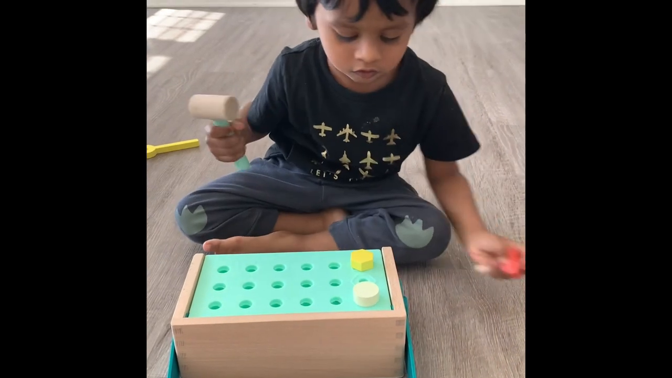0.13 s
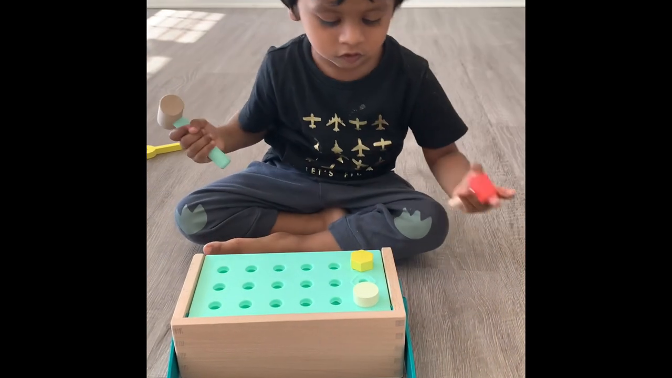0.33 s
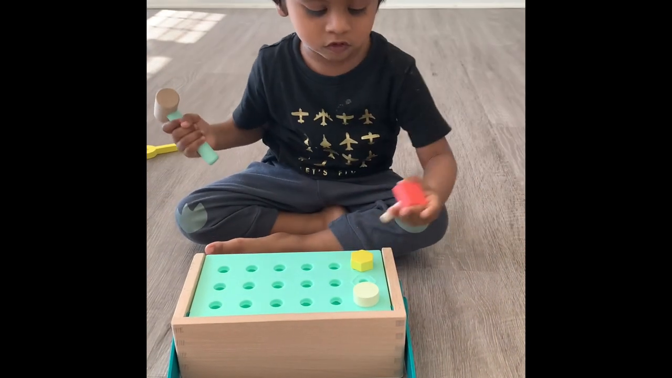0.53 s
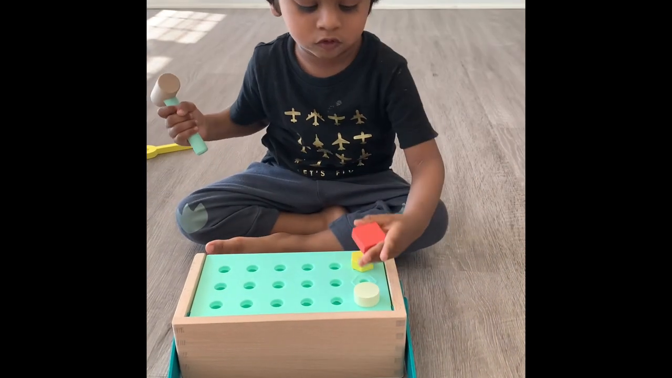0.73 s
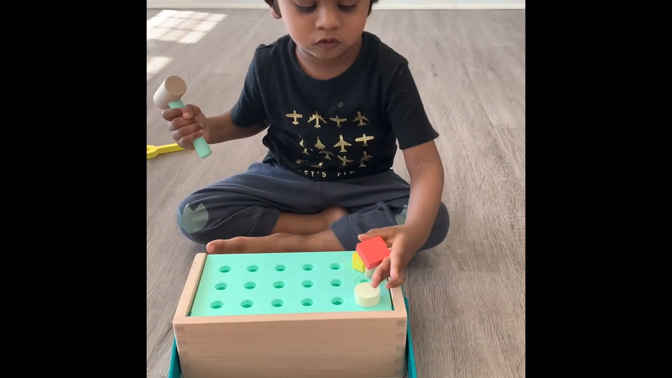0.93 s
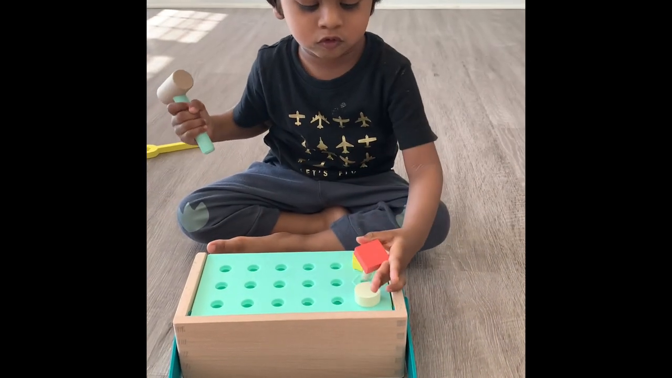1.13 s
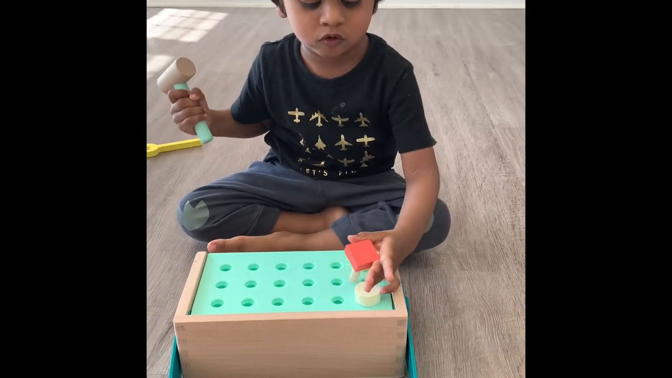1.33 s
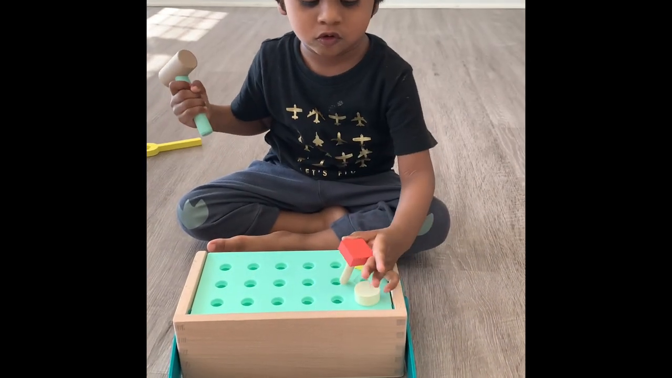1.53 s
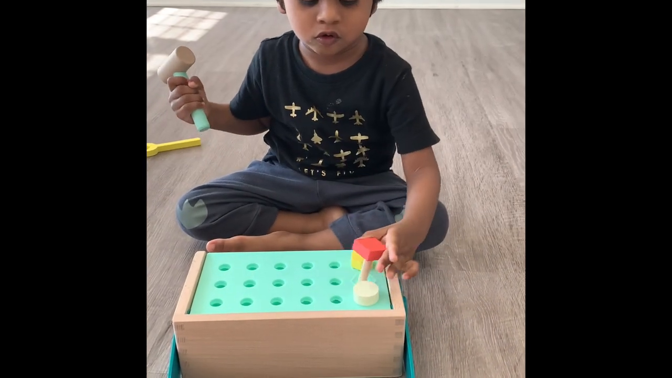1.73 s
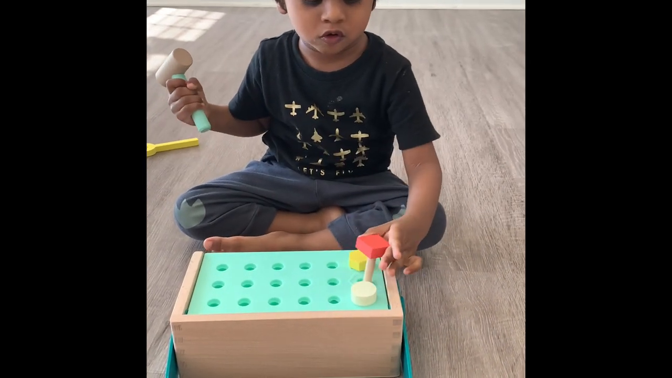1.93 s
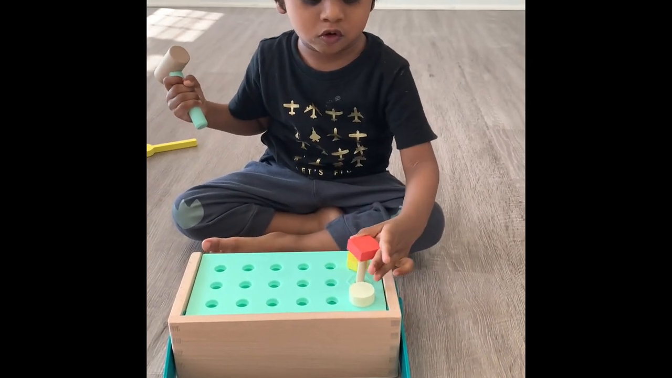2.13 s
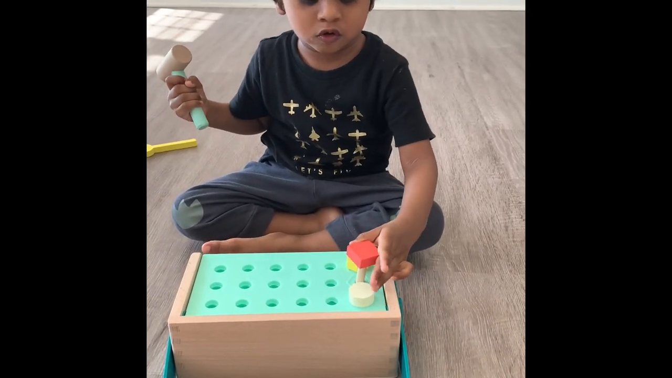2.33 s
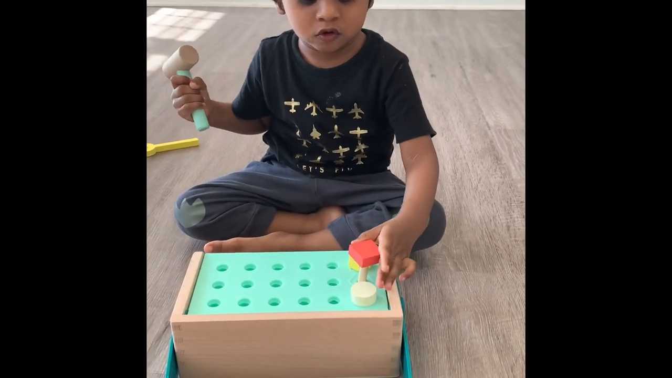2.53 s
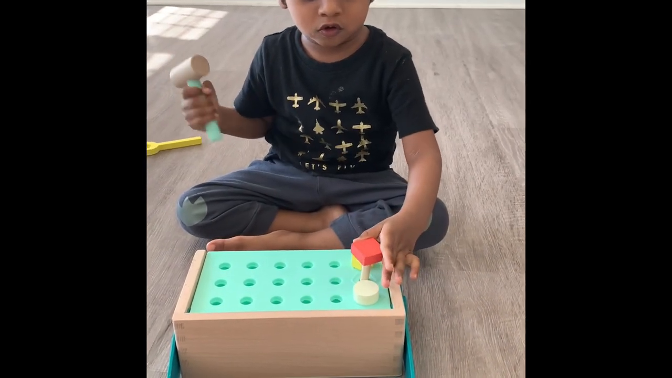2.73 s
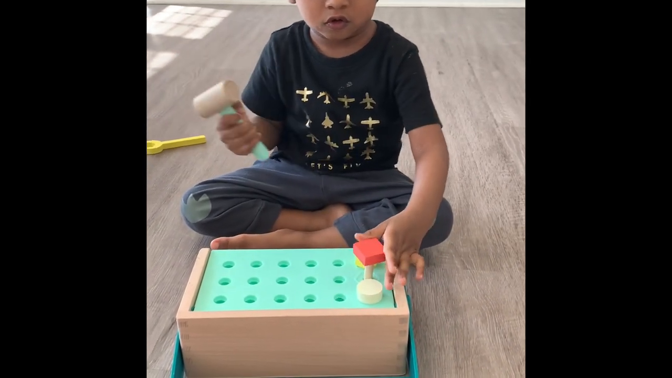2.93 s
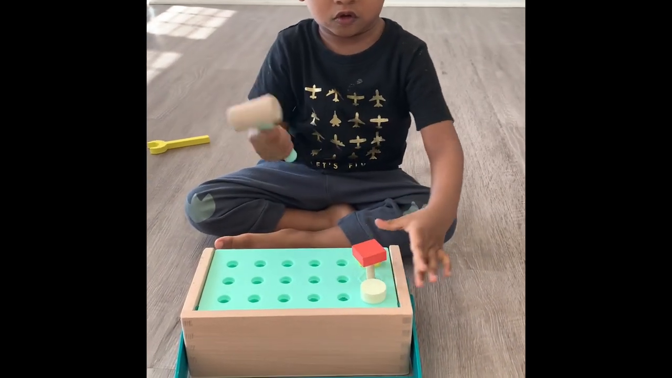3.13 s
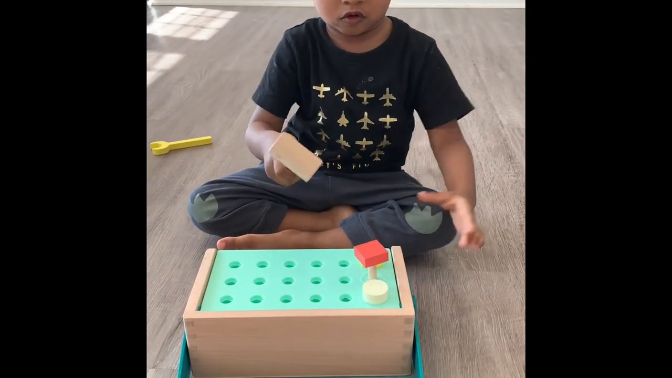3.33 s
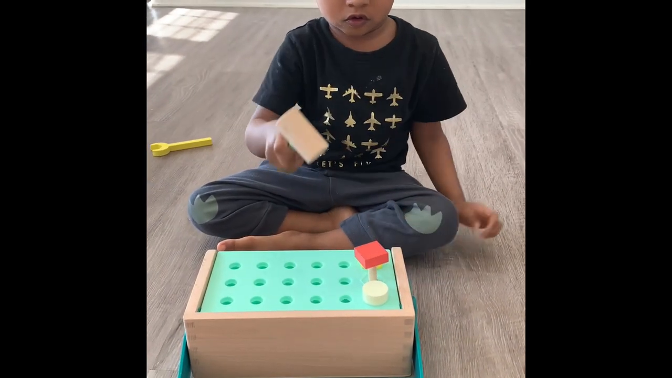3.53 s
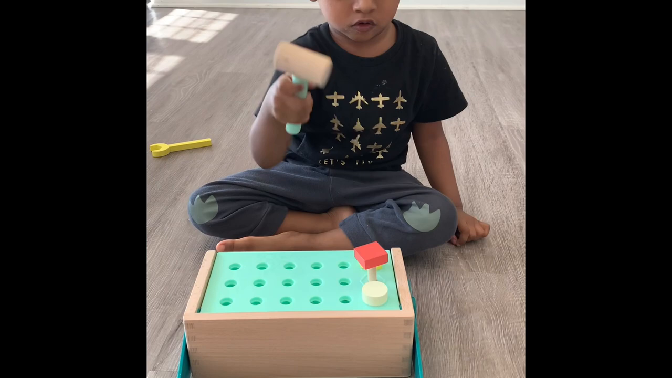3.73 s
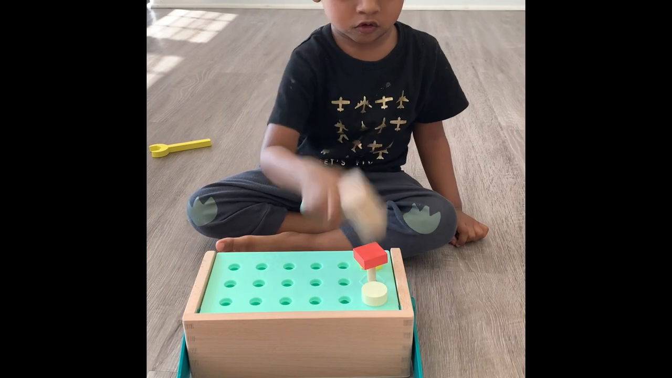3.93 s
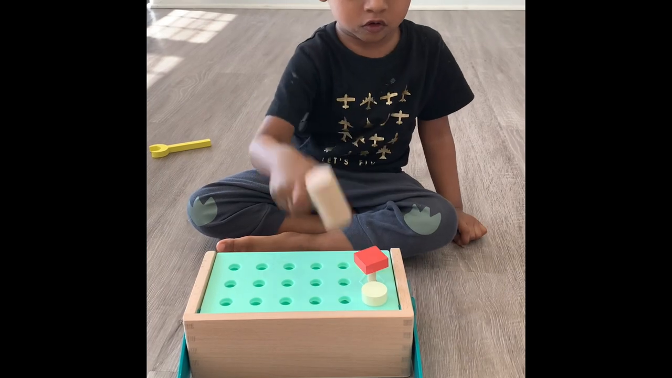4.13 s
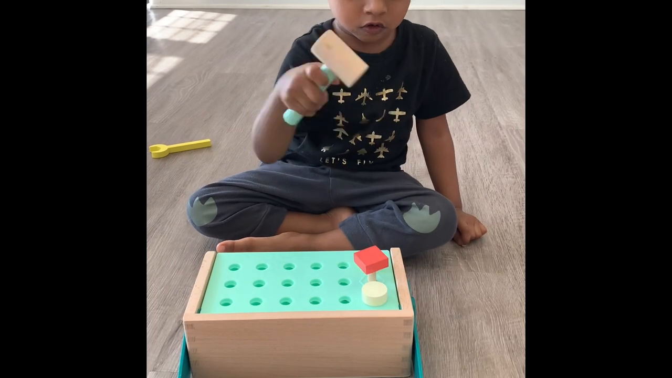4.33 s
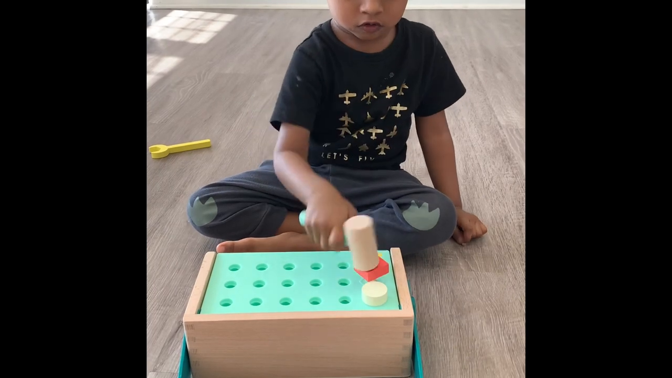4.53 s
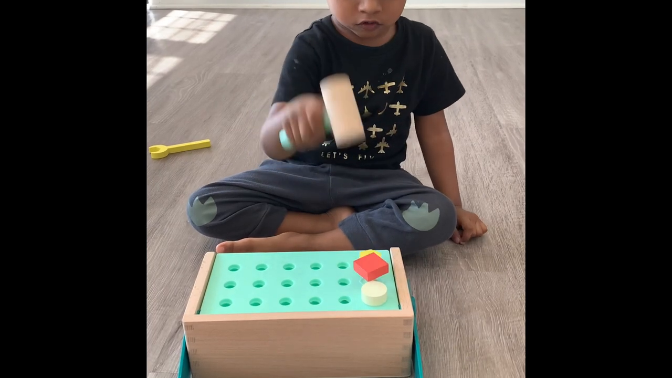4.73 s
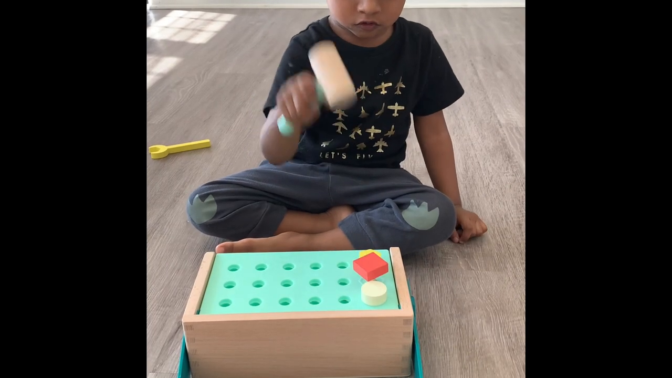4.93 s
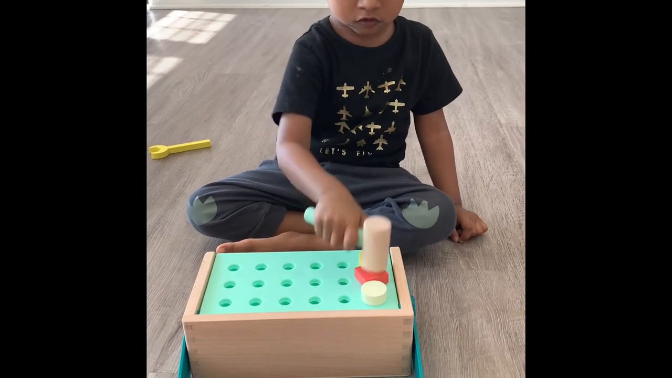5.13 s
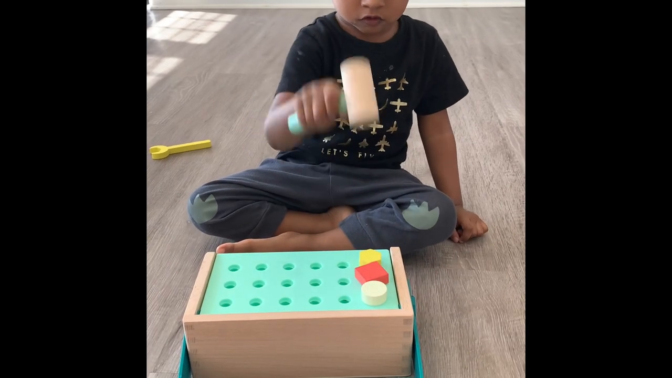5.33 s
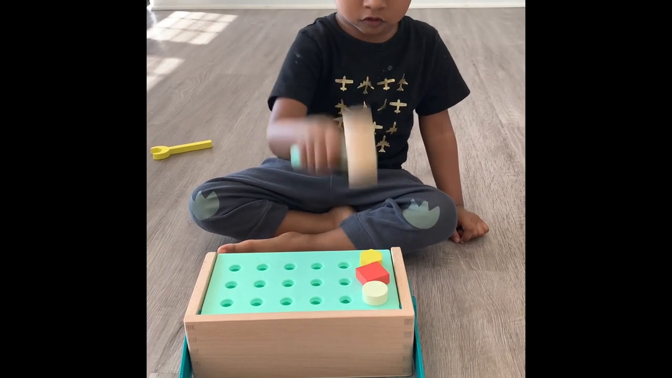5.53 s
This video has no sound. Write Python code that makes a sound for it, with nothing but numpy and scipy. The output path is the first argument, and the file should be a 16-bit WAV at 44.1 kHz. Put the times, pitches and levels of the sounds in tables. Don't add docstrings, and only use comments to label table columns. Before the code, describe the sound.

A bare, reverberant room with a steady low ventilation hum and little hiss, captured in close stereo. A faint tick and cloth rustle open at 0 s. From about 0.86 s a wooden peg is handled against a hollow toy box: small dry ticks at 0.9, 1.1 and 1.3-1.4 s, a busier cluster with a short rasp around 1.6-1.7 s, a soft one at 1.9 s and a clear sharp click at 2.1 s. A weak scrape follows at 2.9 s, then near quiet with slight fabric rustle around 3.6 s. A wooden mallet strikes the peg at 3.95, 4.48 and 5.04 s, far louder than before: first bright, then the hardest, higher crack, then a duller, fuller knock with strong board ring. Each blow bounces once about 15 milliseconds later, thumps the box and floor, and leaves echoes lasting over half a second. A tiny tick and rustle come near 5.6 s.

```python
import sys
import numpy as np
from scipy import signal
from scipy.fft import rfft, irfft, next_fast_len
from scipy.io import wavfile
from scipy.ndimage import uniform_filter1d

SR = 44100
rng = np.random.default_rng(int(sys.argv[2]) if len(sys.argv) > 2 else 0)


def generate_wav(sig):
    pcm = np.round(np.clip(np.atleast_2d(sig).T, -1, 1) * 32767).astype(np.int16)
    wavfile.write(sys.argv[1], SR, pcm)


def to_linear_factor(level_db):
    exponent = np.asarray(level_db, float) / 20
    return 10 ** exponent


N = 246078
ECHO_DRAWS = 3

# pitch_hz, level_db (per Hz)
AIR = [(25, -35), (45, -23), (80, -1), (125, -3), (190, -9), (340, -14), (500, -18.5), (1000, -23),
       (1600, -37.5), (2500, -51), (4000, -54), (6000, -53.5), (14300, -56.5), (15200, -75)]
# pitch_hz, width_hz, wavering_db, steady_db
DRONES = [(56.8, 8.6, -51, -68), (148.6, 7.4, -57.5, -51.5), (332.7, 10, -65.5, -79)]
# start_s, crack_db, knock_db, knock_hz, seating_db
TICKS = [(0.0045, -48, -35.5, 1350, -68), (0.857, -61, -40, 2750, -34.5), (1.121, -64, -50.5, 2500, -59),
         (1.305, -60, -50.5, 1200, -41.5), (1.356, -56, -37, 865, -32.5), (1.404, -68, -51, 900, -44),
         (1.606, -64, -41, 900, -73), (1.623, -47, -40.5, 1300, -50), (1.636, -46, -47, 2700, -62),
         (1.649, -36.5, -37, 2310, -58), (1.704, -62, -36.5, 860, -38.5), (1.941, -74, -51.5, 2170, -39),
         (2.137, -29, -34.5, 2350, -41), (2.144, -42, -38, 2070, -44.5), (2.152, -70, -38, 2000, -66),
         (5.575, -48, -39.5, 2500, -63.5)]
# start_s, rustle_db, snap_db, snap_hz
RUSTLES = [(.0045, -72.5, -41.5, 5400), (.005, -76, -41, 12600), (.21, -81, -75, 12000),
           (1.655, -72, -65, 8000), (1.36, -81, -80, 6000), (3.02, -92, -64, 6200),
           (3.568, -70.5, -49.5, 7000), (3.69, -79.5, -64.5, 9000), (5.574, -84, -42.5, 5540)]
# start_s, rub_db, hold_s
STROKES = [(.01, -64, 0.0078), (.87, -67.5, 0.021), (1.11, -70, 0.039), (1.35, -62, 0.02),
           (1.611, -55.5, 0.022), (1.71, -85, 0.042), (1.949, -69, 0.0088), (2.14, -59.5, 0.017),
           (2.89, -74.5, 0.027)]
# start_s, crack_db, knock_db, box_db, hardness_db (per octave)
BLOWS = [
    (3.9530, -4, -18, -30, 3.0),
    (4.4783, 1, -13.5, -18, 3),
    (5.0411, -4, -10, -20.5, -2.2),
]
# knock_pitch (ratio to the usual), board_ring_db
LANDINGS = [
    (0.79, -22.5),
    (1.28, -19.5),
    (0.95, -10),
]
# delay_s, crack_db, crack_hz, knock_db, knock_hz
CHATTER = [
    (0, 2.5, 6980, -1.5, 2193),
    (.0007, -3.5, 11940, 0, 3300),
    (.0021, -5.5, 5900, -2.5, 1620),
    (.005, -5, 3900, -3, 950),
]
# start_s, crack_db, knock_db, box_db
REBOUNDS = [(3.967, -18, -27, -25.5), (4.494, -14.5, -34, -19.5), (5.0557, -19, -19.5, -11)]
# pitch_hz, level_db, t60_s
PEG_MODES = [(764, -3.5, 0.023), (816, -11, 0.017), (936, -2.5, 0.07), (1256, -7, 0.042),
             (1420, 2.5, 0.016), (1662, 2, 0.013), (2000, -2.5, 0.0049), (2240, 1.5, 0.016),
             (2706, 3, 0.0093), (3020, 0, 0.011), (3543, -2, 0.014), (4140, -7.5, 0.031)]
# pitch_hz, level_db, t60_s
BOX_MODES = [(313, -7, 0.026), (457, -2, 0.04), (554, -10.5, 0.059), (660, -6, 0.021)]
# start_s, peak_db, pitch_hz
THUMPS = [(3.966, -20, 309.5), (3.967, -25.5, 137.7), (4.012, -26.5, 105), (4.481, -14.5, 256),
          (4.492, -22, 171), (4.534, -26.5, 112), (5.057, -15, 260), (5.097, -23.5, 128.4),
          (5.107, -26, 88)]
# pitch_hz, level_db, t60_s
BOARD_MODES = [(438.6, -19, .1), (519.4, -23, 0.78), (717, -11, 0.058), (953, -19, .2), (1395, -21.5, .15),
               (1697, -20.5, 0.13)]
# pitch_hz, t60_s, level_db
ROOM = [(57.7, 0.14, 6), (260, 0.65, -6.5), (670, 0.72, 4), (1300, 0.78, 2.5), (2000, 0.5, 4),
        (3300, 0.76, 5.5), (4860, 0.66, 5.5), (8000, 0.61, -12), (12000, 0.31, 4.5), (16000, 0.24, -3)]
# pitch_hz, phase_lag_rad
TURN = [(20, 0), (300, .3), (550, 1.6), (900, .2), (1400, -.9), (1720, 0), (2150, 1.3), (2550, 3.1),
        (3000, 2.7), (3700, 3.2), (4250, 8.8), (5000, 9.4), (9900, 15.7), (14900, 22.0)]
# pitch_hz, likeness (0-1), right_minus_left_db
LIKENESS = [(20, 1, 0.5), (192, 0.98, 0.78), (404, 0.92, 7), (670, 0, -3.5), (1510, 0.33, 0.5),
            (2500, 0.65, -0.5), (4000, 0.21, -0.5), (5400, 0.84, 1), (8000, 0.9, -1.5), (9500, 1, -2.5),
            (20000, 0.4, 3.5)]


def rms_one(x):
    return x / np.sqrt(np.mean(x ** 2) + 1e-20)


def at_hz(points, hz, axis=1):
    return np.interp(np.log(hz), np.log(np.array(points)[:, 0]), np.array(points)[:, axis])


def band(x, low_hz, high_hz):
    return signal.sosfilt(signal.butter(2, [low_hz, high_hz], "band", fs=SR, output="sos"), x)


def low_pass(x, hz):
    return signal.sosfilt(signal.butter(2, hz, fs=SR, output="sos"), x)


def drift(rate_hz):
    r = np.exp(-80 * np.pi * rate_hz / SR)
    slow = signal.lfilter([1], [1, -2 * r, r * r], rng.standard_normal(N // 40 + 2002))[2000:]
    return np.interp(np.arange(N) / 40, np.arange(len(slow)), rms_one(slow))


def ring(clicks, hz, t60):
    r, w = to_linear_factor(-60 / (t60 * SR)), 2 * np.pi * hz / SR
    return signal.lfilter([0, np.sin(w)], [1, -2 * r * np.cos(w), r * r], clicks + 1e-18)


def ventilation(patchy_db):
    air, edges = 0, 22 * 2 ** np.arange(0, 9.8, .5)
    white = rng.standard_normal((2, 2, N + SR))
    for k, (low, high) in enumerate(zip(edges, edges[1:])):
        gain = to_linear_factor(at_hz(AIR, np.sqrt(low * high)) + patchy_db * drift(1.64))
        air = air + gain * band(white[k % 2], low, high)[:, SR:]
    out = to_linear_factor(-51) * rms_one(air)
    for hz, width, wavering_db, steady_db in DRONES:
        drone = band(rng.standard_normal(N + SR), hz - width / 2, hz + width / 2)[SR:]
        tone = np.sin(2 * np.pi * hz * np.arange(N) / SR + 0.78 * drift(1.6))
        out = out + to_linear_factor(wavering_db) * rms_one(drone) + to_linear_factor(steady_db) * rms_one(tone)
    return out


def tick_contacts():
    rows = []
    for s, crack_db, knock_db, hz, seating_db in TICKS:
        crack_hz = max(2.33 * hz, 2970)
        rows.append((s, crack_db, crack_hz, knock_db, hz, seating_db - 0.5))
    for s, _, snap_db, hz in RUSTLES:
        rows.append((s, snap_db, hz, -np.inf, hz, -np.inf))
    return rows


def swells(rows, rise_db_per_s, fall_db_per_s):
    t, gain = np.arange(N) / SR, 0
    for s, db, hold in rows:
        rise = rise_db_per_s * np.maximum(s - t, 0)
        fall = fall_db_per_s * np.maximum(t - s - hold, 0)
        gain = gain + to_linear_factor(db - rise - fall)
    return gain


def rubbing():
    size = to_linear_factor(2.3 * np.minimum(rng.exponential(1, N), 2.5))
    grains = size * rng.choice([-1, 1], N) * (rng.random(N) < 900 / SR)
    rasp = ring(grains, 2630, 0.014) + 1.9 * ring(grains, 2080, 0.0088)
    rasp = rasp + 0.86 * ring(grains, 860, 0.02) + .5 * ring(grains, 1200, 0.013)
    rasp = rasp + 9 * band(band(grains, 1630, 3000), 1100, 7500)
    cloth = rms_one(band(rng.standard_normal(N) + .1 * grains, 4200, 16000))
    strokes = swells(STROKES, rise_db_per_s=491, fall_db_per_s=260)
    rustle = swells([(s, db, 0.017) for s, db, *_ in RUSTLES], rise_db_per_s=900, fall_db_per_s=400)
    return strokes * rms_one(rasp) + (rustle + to_linear_factor(-93)) * cloth


def blow_contacts():
    rows = []
    for (s, crack_db, knock_db, box_db, hard), (pitch, _) in zip(BLOWS, LANDINGS):
        for late, c_db, c_hz, k_db, k_hz in CHATTER:
            bright_db = hard * np.log2(c_hz / 7000)
            rows.append((s + late, crack_db + c_db + bright_db, c_hz, knock_db + k_db, k_hz * pitch, box_db))
    for s, crack_db, knock_db, box_db in REBOUNDS:
        rows.append((s, crack_db, 7520, knock_db, 998, box_db))
    return rows


def cracks(events, burst_s, width, broad):
    out, t = np.zeros((ECHO_DRAWS, N + 512)), np.arange(512) / SR
    noises = rng.standard_normal((len(events), 512))
    for k, ((s, crack_db, hz, *_), noise) in enumerate(zip(events, noises)):
        burst = (t == 0) + 0.21 * noise * np.exp(-t / burst_s)
        crack = band(burst, hz / width, hz * width) + broad * band(burst, 2500, 18000)
        out[k % ECHO_DRAWS, int(s * SR):][:512] += to_linear_factor(crack_db) * crack / np.abs(crack).max()
    return out[:, :N]


def struck(seconds, strength_db, modes, soft_hz, spread_db):
    at = (seconds * SR).astype(int)
    luck = rng.standard_normal((len(seconds), len(modes), 2))
    out = 0
    for k, (hz, level_db, t60) in enumerate(modes):
        clicks = np.zeros((ECHO_DRAWS, N))
        strength = to_linear_factor(strength_db[:, k] + level_db + spread_db * luck[:, k, 0])
        clicks[np.arange(len(at)) % ECHO_DRAWS, at] = strength * np.sign(luck[:, k, 1])
        out = out + ring(clicks, hz, t60)
    return low_pass(out, soft_hz)


def knocks(rows, soft_hz, broad):
    events = np.array(rows)
    seconds = events[:, 0]
    octaves_off = np.log2(np.array(PEG_MODES)[:, 0] / events[:, [4]])
    peg_db = events[:, [3]] - 3 - 14 * octaves_off ** 2
    box_db = np.repeat(events[:, [5]] - 6, len(BOX_MODES), axis=1)
    peg = struck(seconds, peg_db, PEG_MODES, soft_hz, spread_db=2.56)
    box = struck(seconds, box_db, BOX_MODES, soft_hz=1200, spread_db=5.0)
    return cracks(events, burst_s=0.00089, width=1.253, broad=broad) + peg + box


def contacts():
    touches = knocks(tick_contacts(), soft_hz=2980, broad=0.067)
    return touches + knocks(blow_contacts(), soft_hz=9000, broad=0.18)


def booms():
    rows = [(s, db, 372.5, 0.052) for s, *_, db in TICKS]
    rows += [(s, db, hz, 10.3 / hz) for s, db, hz in THUMPS]
    for (s, *_), (_, ring_db) in zip(BLOWS, LANDINGS):
        rows += [(s, ring_db + db, hz, t60) for hz, db, t60 in BOARD_MODES]
    out, t = np.zeros(N), np.arange(SR // 2) / SR
    for s, peak_db, hz, t60 in rows:
        swell = (1 - np.exp(-t / 0.0012)) * to_linear_factor(peak_db + 2 - 60 * t / t60)
        boom = np.sin(2 * np.pi * hz * t) * swell
        out[int(s * SR):][:len(t)] += boom[:N - int(s * SR)]
    return out


def gated(spectrum, size):
    gate_hz, gate_db = 3960, -70
    share = 1 / (1 + (gate_hz / np.maximum(np.fft.rfftfreq(size, 1 / SR), 1)) ** 4)
    dull, bright = irfft(np.array([spectrum * (1 - share), spectrum * share]), size)[..., :N]
    power = uniform_filter1d(bright ** 2, size=1024)
    return dull + bright * power / (power + to_linear_factor(2 * gate_db))


def room(x):
    level_db, rise_s = -6, 0.004
    t, edges = np.arange(SR) / SR, 50 * 2 ** np.arange(0, 8.6, .5)
    white, tail = rng.standard_normal((2, 2, ECHO_DRAWS, SR)), 0
    for k, (low, high) in enumerate(zip(edges, edges[1:])):
        hz = np.sqrt(low * high)
        decay = to_linear_factor(at_hz(ROOM, hz, axis=2) - 60 * t / at_hz(ROOM, hz))
        tail = tail + band(white[k % 2], low, high) * decay
    tail = tail * (1 - np.exp(-(t / rise_s) ** 2))
    tail = tail / np.sqrt(np.sum(tail ** 2) / (2 * ECHO_DRAWS))
    size = next_fast_len(N + SR)
    echoes = np.sum(rfft(tail, size) * rfft(x, size), axis=1)
    return gated(to_linear_factor(level_db) * echoes, size)


def smeared(x):
    lead = int(.028 * SR)
    noise = band(band(band(rng.standard_normal(lead), 700, 6800), 500, 13000), 370, 8600)
    kernel = rms_one(noise * np.linspace(0, 1, lead) ** 2.37) / np.sqrt(lead)
    return x + to_linear_factor(-17.5) * signal.fftconvolve(x, kernel[None], axes=1)[:, -N:]


def scene():
    first_draw = (np.arange(ECHO_DRAWS) == 0)[:, None]
    near = contacts() + (booms() + rubbing()) * first_draw
    return near.sum(axis=0) + room(near) + ventilation(patchy_db=2.52)


def band_limit(x):
    return signal.sosfilt(signal.butter(12, 16500, fs=SR, output="sos"), x)


def record(dry):
    size = next_fast_len(N + 4096)
    hz = np.maximum(np.fft.rfftfreq(size, 1 / SR), 1)
    left, other = rfft(smeared(dry), size)
    other = other * np.exp(-2j * np.pi * hz * 0.001106)
    alike = np.clip(at_hz(LIKENESS, hz), 0, 1)
    right = alike * left + np.sqrt(1 - alike ** 2) * other
    lag_rad = np.interp(hz, *np.transpose(TURN))
    right = right * np.exp(-1j * lag_rad) * to_linear_factor(at_hz(LIKENESS, hz, axis=2))
    top_cut = 1 + (hz / 14900) ** 30
    pair = irfft(np.array([left, right]) / top_cut, size)[:, :N]
    return band_limit(0.89 * np.tanh(pair / 0.9))


dry = scene()
out = record(dry)
generate_wav(out)
```